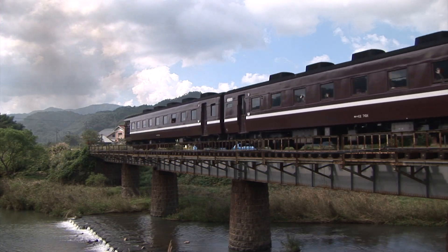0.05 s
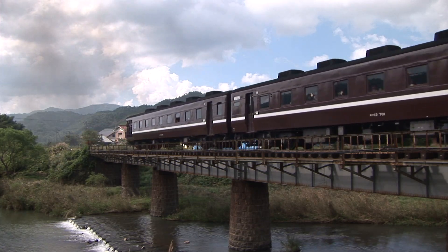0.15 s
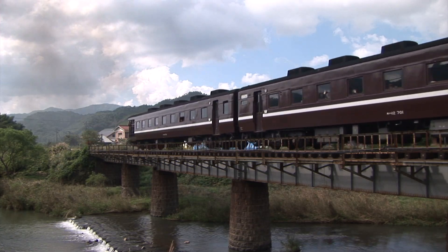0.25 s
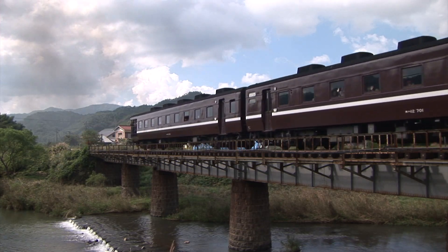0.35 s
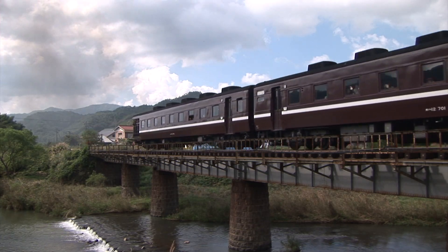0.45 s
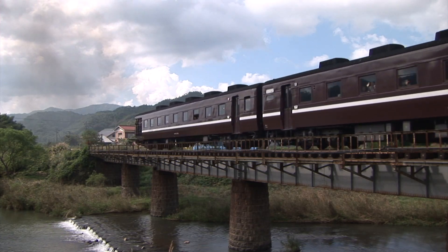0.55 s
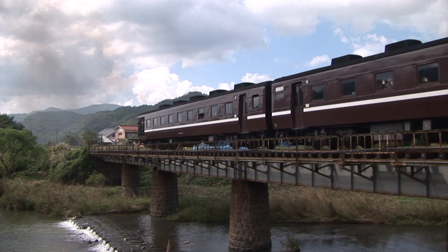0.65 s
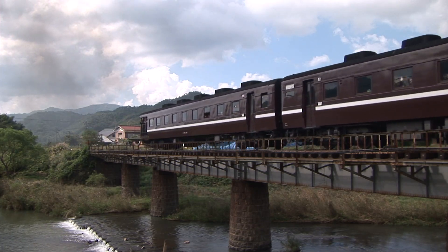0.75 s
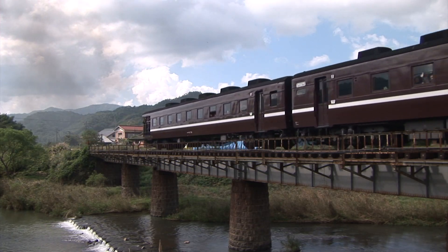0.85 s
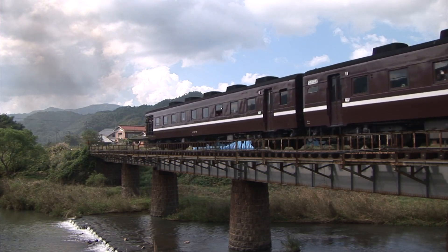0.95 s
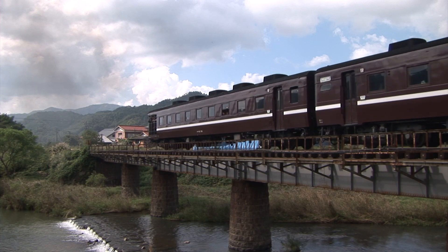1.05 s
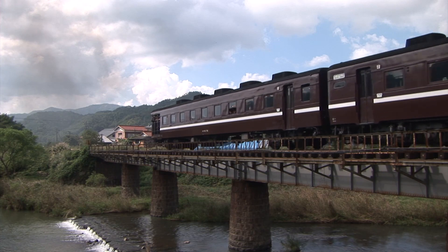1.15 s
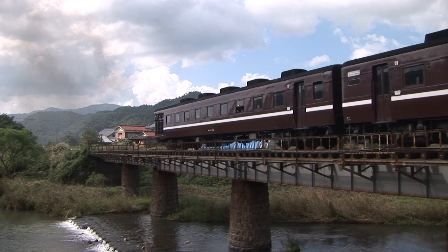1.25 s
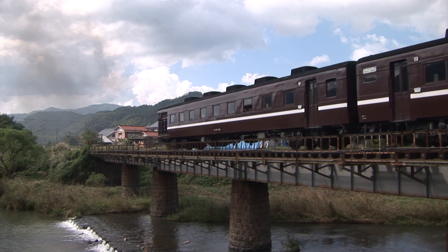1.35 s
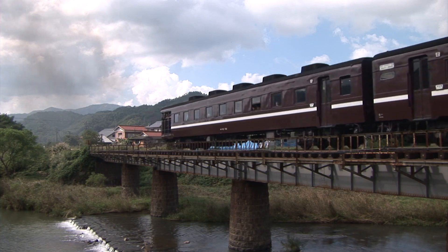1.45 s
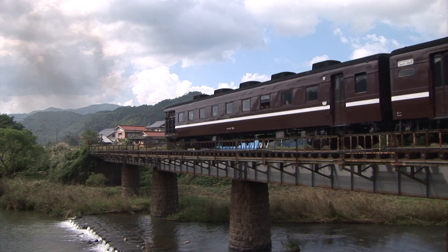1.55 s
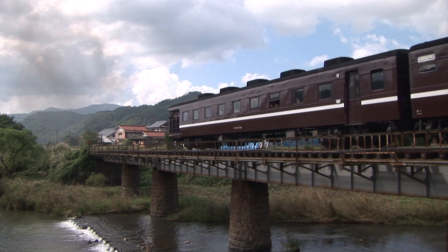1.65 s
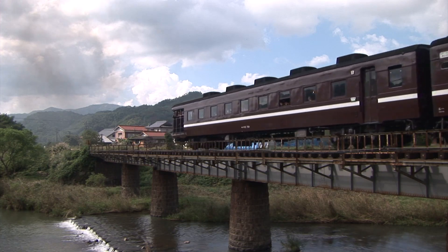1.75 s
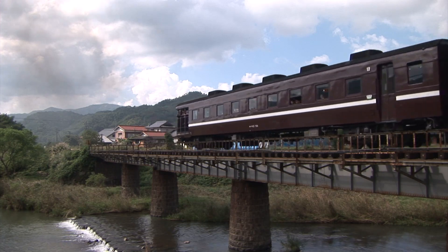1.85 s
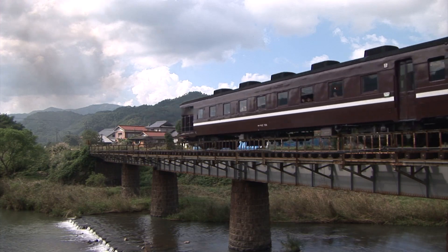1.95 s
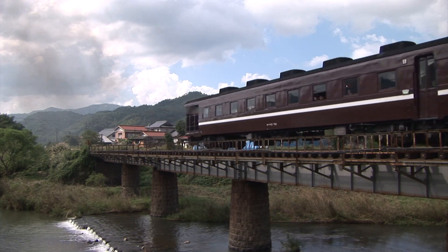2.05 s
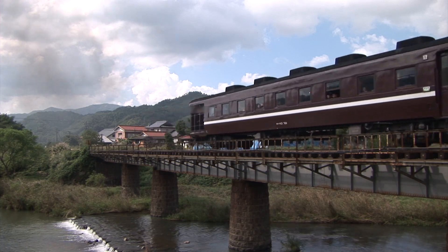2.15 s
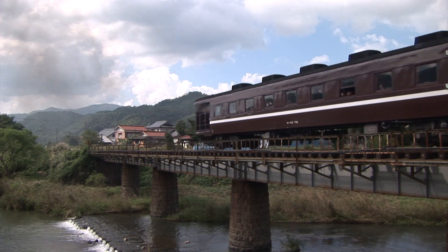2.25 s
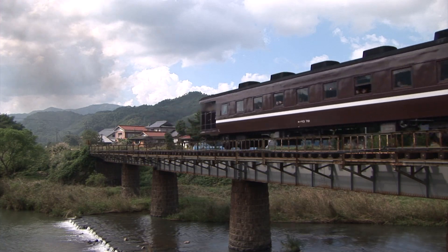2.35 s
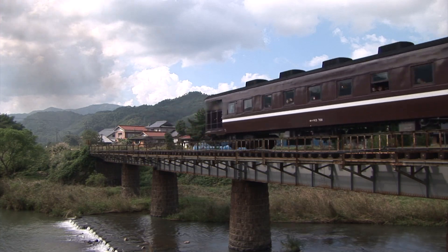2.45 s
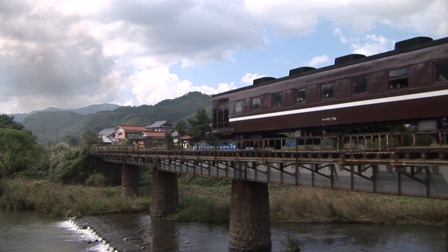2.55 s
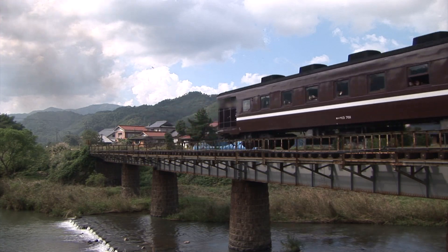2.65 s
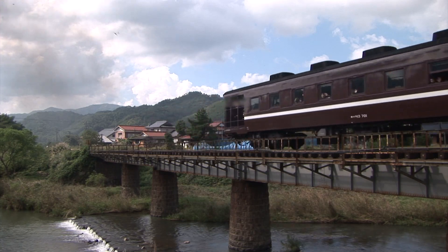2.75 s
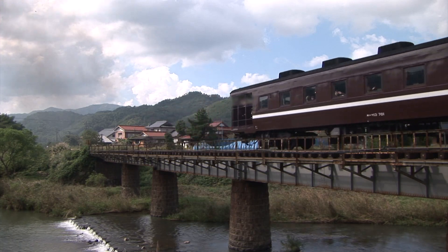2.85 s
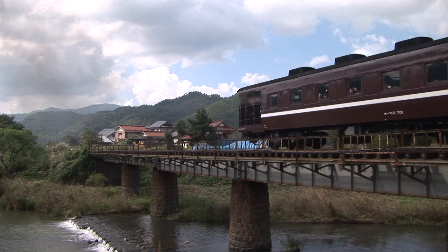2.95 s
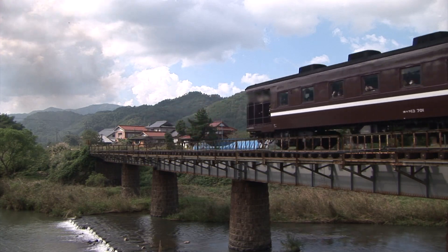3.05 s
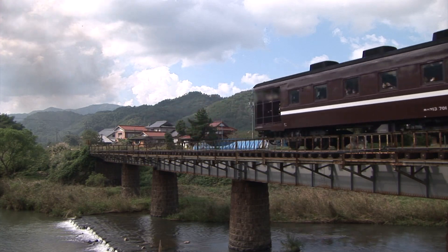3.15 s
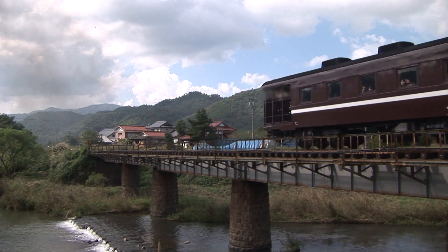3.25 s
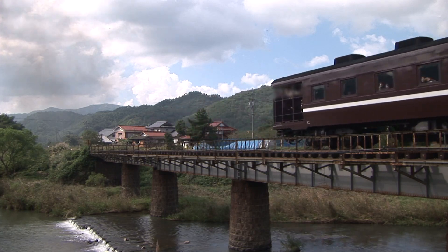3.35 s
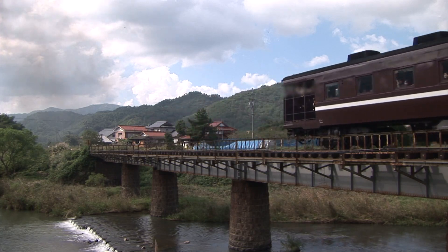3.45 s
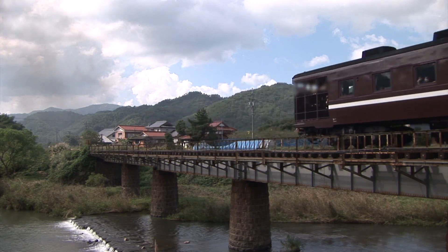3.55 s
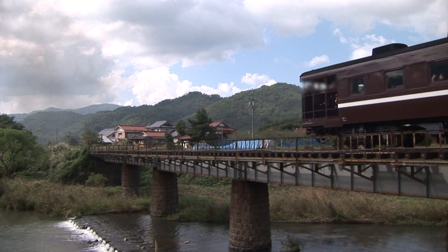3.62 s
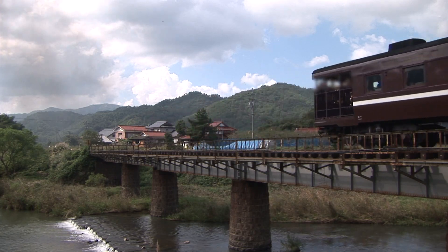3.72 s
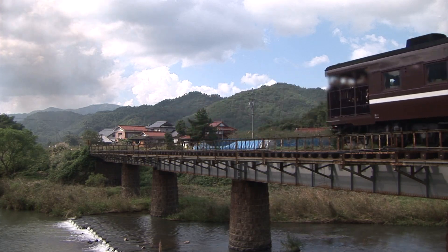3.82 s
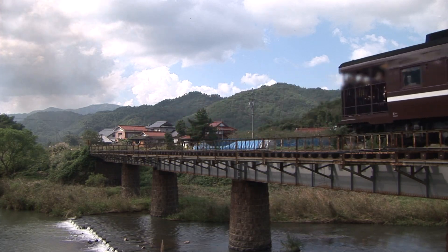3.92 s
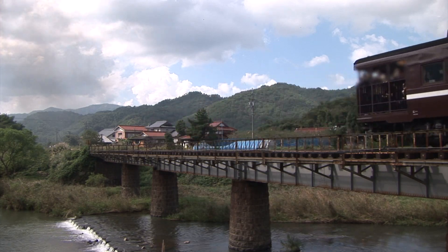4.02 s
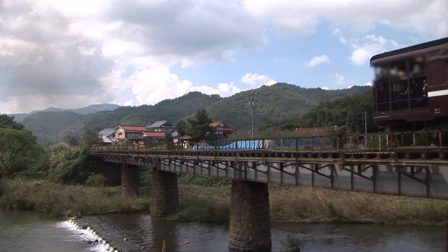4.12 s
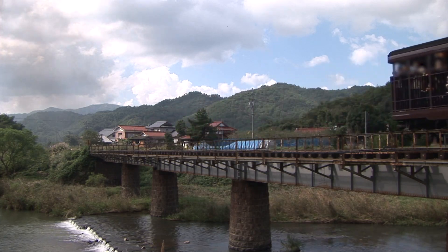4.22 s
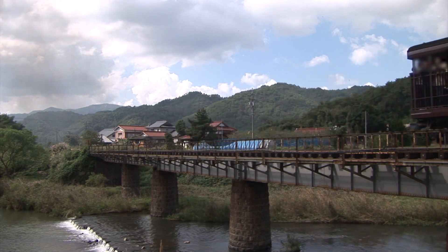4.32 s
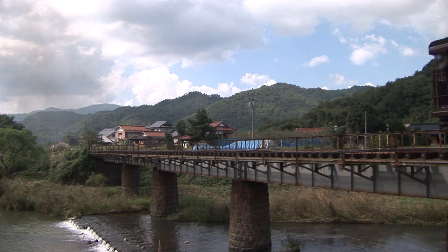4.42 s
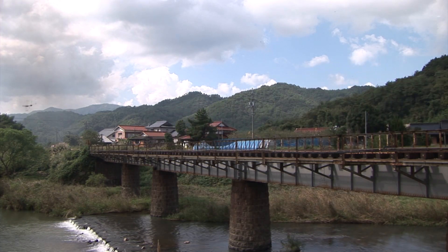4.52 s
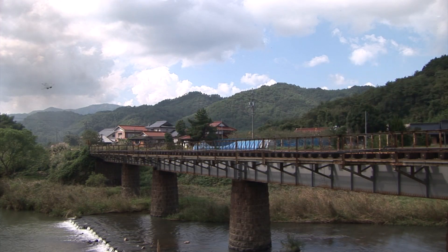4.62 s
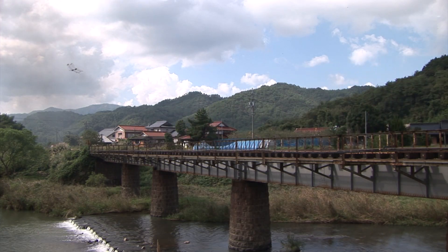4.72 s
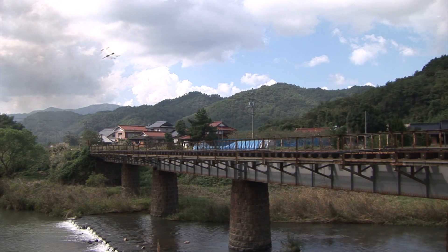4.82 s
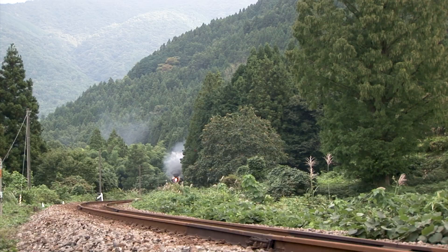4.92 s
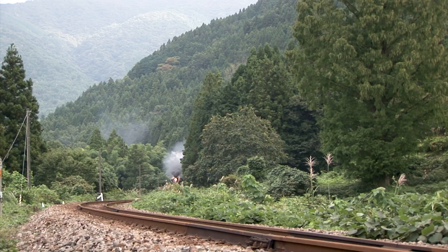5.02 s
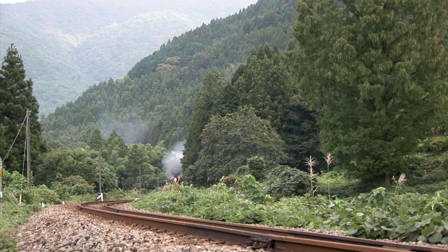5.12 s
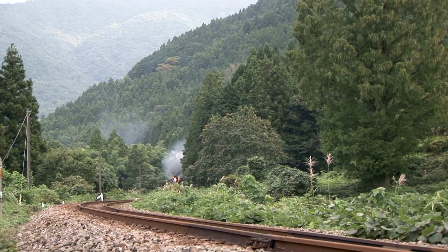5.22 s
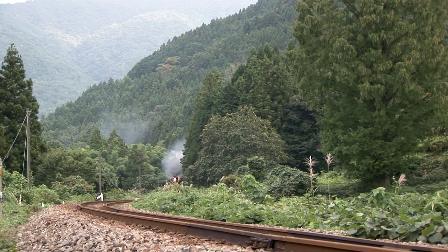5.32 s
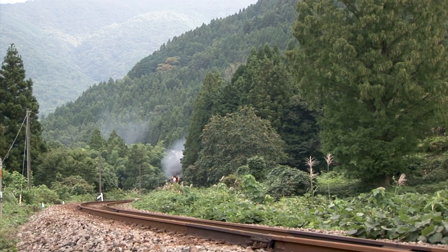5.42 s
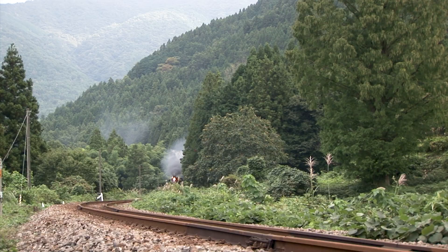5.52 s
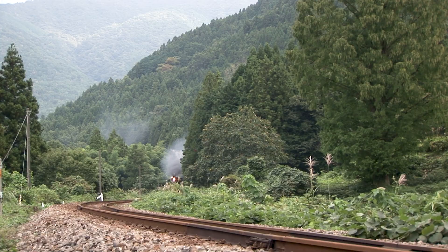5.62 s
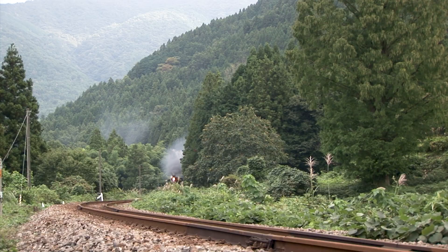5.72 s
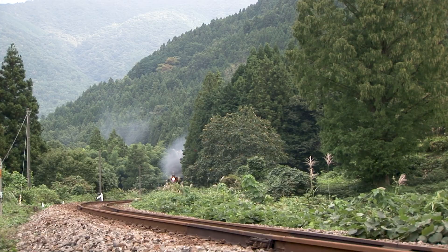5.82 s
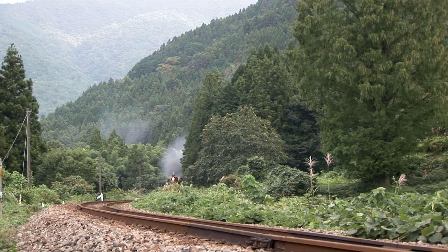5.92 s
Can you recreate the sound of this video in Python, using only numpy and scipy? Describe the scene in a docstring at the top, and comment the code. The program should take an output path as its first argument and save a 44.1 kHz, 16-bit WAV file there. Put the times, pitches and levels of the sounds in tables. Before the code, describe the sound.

Heard from a river bank, passenger coaches roar over a steel girder bridge. Wheels strike a rail joint on the right in pairs, each blow snapping, ringing and booming through the girders, with duller thumps farther ahead. A wheel squeals faintly as the last coach draws off to the right. The bridge fades out, and a very quiet wooded valley follows, with a far-off train murmur and thin bush crickets.

```python
"""From the river bank: the last passenger coaches of a train roar across a steel girder bridge.
Wheels thump on a far rail joint straight ahead, and four two-axle bogies strike a near one on the right:
steel snaps, wheels ring, girders boom, now and then a flange sings. The last coach draws off to the right
and the bridge fades out by 4.9 s. A quiet wooded valley fades in, with a very distant train and
bush crickets in the weeds."""
import sys
import numpy as np
from scipy import signal
from scipy.io import wavfile

SR = 44100
rng = np.random.default_rng(int(sys.argv[2]) if len(sys.argv) > 2 else 0)


def generate_wav(signal):
    """Clip the signal to [-1, 1] and save it as 16-bit WAV at the path in sys.argv[1]."""
    frames = np.transpose(np.atleast_2d(signal))
    scaled = np.clip(frames, -1, 1) * 32767
    pcm = np.round(scaled).astype(np.int16)
    wavfile.write(sys.argv[1], SR, pcm)


N = 263277
TIME = np.arange(N) / SR
EDGES = np.geomspace(28, 15500, 23)  # noise bands [Hz]
CENTRES = np.sqrt(EDGES[1:] * EDGES[:-1])

# bogies at the near joint: (time [s], gap to the second axle [s], force [dB], long ring [dB])
BOGIES = [(0.1802, 0.26, -17, -1.5), (2.012, 0.25, -17.5, -0.3), (2.8984, 0.2502, -18, -2),
          (4.680, .252, -18.5, -1.5)]
# wheels at the far joint: (time [s], force [dB], brightness [dB/octave], long ring [dB])
FAR_STRIKES = [(-.038, -20, -0.23, 2.5), (1.55, -18, 0, -1.5), (1.81, -20, -0.5, 2)]
# a source on the right, at the microphone: (frequency [Hz], left minus right [dB])
RIGHT_PAN = [(80, -0.5), (220, 2.5), (600, -5), (1200, -6), (2600, -7), (4500, -2.5), (8000, 0.5),
             (13000, -2.5)]


def from_db(db):
    """Decibels to gain."""
    return 10 ** (np.asarray(db) / 20)


def unit_rms(x):
    """Scale to an rms of 1."""
    return x / np.sqrt(np.mean(x ** 2) + 1e-20)


def at_hz(points, hz):
    """Read a table on a log-frequency axis."""
    f, value = np.transpose(points)
    return np.interp(np.log(hz), np.log(f), value)


def band_gains(colour):
    """The rms of each band for a sound of this colour and unit power."""
    gains = from_db(at_hz(colour, CENTRES)) * np.sqrt(np.diff(EDGES))
    return gains / np.linalg.norm(gains)


def pan(left_db):
    """Left and right gains for a level difference."""
    gains = from_db(np.array([[.5], [-.5]]) * left_db)
    return gains / np.sqrt(np.mean(gains ** 2, axis=0))


def drift(rate):
    """A random wander of unit rms, with `rate` turns a second."""
    knots = rng.standard_normal(4096)
    return unit_rms(np.interp(TIME * rate, np.arange(len(knots)), knots))


def stereo_noise(alike):
    """White noise with a given left-right correlation."""
    mid, side = rng.standard_normal((2, N))
    alike = np.clip(alike, 0, .998)
    return np.sqrt((1 + alike) / 2) * mid + np.sqrt((1 - alike) / 2) * side * [[1], [-1]]


def dense_modes(spread):
    """Countless overlapping modes: unit stereo noise in each band, its image wider with spread."""
    # likeness of the channels at spread 1: (frequency [Hz], correlation [0-1])
    likeness = [(60, .99), (250, .95), (600, .92), (1200, .91), (2500, .87), (4500, .72), (8000, .95),
                (13000, .85)]
    correlations = 1 - spread * (1 - at_hz(likeness, CENTRES))
    filters = [signal.butter(2, edge, "band", fs=SR, output="sos") for edge in zip(EDGES, EDGES[1:])]
    return [unit_rms(signal.sosfilt(f, stereo_noise(alike))) for f, alike in zip(filters, correlations)]


def resonate(force, modes):
    """Parallel resonances (frequency [Hz], width [Hz], level [dB] under unit white noise)."""
    out = 0
    for hz, width, db in modes:
        r = np.exp(-np.pi * width / SR)
        gain = from_db(db) * np.sqrt((1 - r * r) / 2)
        feedback = [1, -2 * r * np.cos(2 * np.pi * hz / SR), r * r]
        out = out + gain * signal.lfilter([1, 0, -1], feedback, force + 1e-18)
    return out


def swell(starts, rise_s, t60):
    """One row per blow: power that builds up and dies away."""
    age = np.maximum(TIME - np.asarray(starts)[:, None], 0)
    return (1 - np.exp(-age / rise_s)) ** 2 * np.exp(-np.minimum(np.log(1e6) * age / t60, 60))


def blow_power(strikes, colour, swells, extra_db):
    """Power in time for each band, summed over blows of their own force and brightness."""
    _, force_db, tilt_db, _ = np.transpose(strikes)
    octaves = np.log2(CENTRES / 500)[:, None]
    gains = band_gains(colour)[:, None] * from_db(force_db + extra_db + octaves * tilt_db)
    return gains ** 2 @ swells


def near_strikes():
    """Rows like FAR_STRIKES; each second wheel meets a rail still shaking: brighter, with more ring."""
    first = [(s, db, 0, ring_db) for s, gap, db, ring_db in BOGIES]
    second = [(s + gap, db - .04, .29, ring_db + 3.5) for s, gap, db, ring_db in BOGIES]
    return first + second


def fader(position):
    """Square-law gain for a fader position 0-1."""
    return np.clip(position, 0, 1) ** 2


def valley(level_db=-61.5):
    """Far off among the woods a train murmurs under a thin high hiss."""
    # the murmur: (frequency [Hz], relative density [dB])
    colour = [(30, 1.5), (60, 0), (110, -6), (180, 3.5), (330, 0), (520, 2.5), (730, -8), (1250, -5.5),
              (2000, -18), (3200, -22), (5500, -24.5), (9500, -25), (12500, -26), (14500, -33.5)]
    # faint peaks in the hiss: (frequency [Hz], width [Hz], relative level [dB])
    hiss_peaks = [(4150, 370, -1), (6370, 145.5, -2)]
    bands = zip(dense_modes(spread=2.2), band_gains(colour))
    murmur = sum(band * gain * from_db(.5 * drift(rate=9)) for band, gain in bands)
    hiss = from_db(-81) * resonate(stereo_noise(alike=.47), hiss_peaks)
    return pan(left_db=1.5) * (from_db(level_db) * murmur + hiss)


def bush_crickets(level_db=-77.5, strokes_per_s=37, wing_hz=11700, phrase_s=.4, peak_at_s=5.6):
    """Each wing stroke is a short, very high rasp of uneven strength; the song swells in even phrases."""
    pace = strokes_per_s * (1 + .22 * drift(rate=25))
    strokes = np.abs(np.sin(np.pi * np.cumsum(pace) / SR)) * from_db(1.3 * drift(rate=22))
    wing = [(wing_hz, 2600, 0)]
    rasp = unit_rms(resonate(resonate(stereo_noise(alike=.53), wing), wing))
    phrase_db = 3 * np.cos(2 * np.pi * (TIME - peak_at_s) / phrase_s)
    return from_db(level_db + phrase_db) * strokes * rasp


def rolling(level_db=-32, recede_from_s=3.36, recede_db_per_s=3, closest_after_s=.24, close_for_s=.25):
    """Rough treads shake the span and keep plates and wheels singing; a close bogie adds bass and top."""
    # the roar of the span: (frequency [Hz], relative density [dB])
    colour = [(18, -57), (30, -30.5), (170, -2), (334, -2.5), (422, 1), (469, -0.5), (533, -4),
              (1160, -7.5), (1850, -17.5), (2160, -18), (2340, -19.5), (3540, -27.5), (4590, -43),
              (8780, -66), (14700, -67.5)]
    # singing plates and wheels: (frequency [Hz], width [Hz], relative level [dB])
    modes = [(296.3, 10, 2.5), (432, 17, -3.5), (536, 7, 12), (2126, 32, 2), (2442, 35, -5),
             (2750, 22, -5.5), (3230, 24, -11.5), (3404, 27, -17), (3970, 33, -11), (4230, 30, -15.5)]
    close = sum(np.exp(-.5 * ((TIME - s - closest_after_s) / close_for_s) ** 2) for s, *_ in BOGIES)
    receding_s = np.maximum(TIME - recede_from_s, 0)
    tilt_db = .04 + 2 * close * np.exp(-receding_s)  # per octave; dulls as the last coach draws away
    bass_db = -.5 + 5 * close
    bearing = .15 + .1 * TIME  # 0 ahead, 1 right
    roar = 0
    for band, gain, hz in zip(dense_modes(spread=1.4), band_gains(colour), CENTRES):
        colour_db = tilt_db * np.log2(max(hz / 500, 1)) + bass_db / (1 + (hz / 250) ** 2)
        flicker_db = .5 * drift(rate=21)
        roar = roar + band * gain * from_db(colour_db + flicker_db) * pan(bearing * at_hz(RIGHT_PAN, hz))
    tones = from_db(-22.5) * pan(-5 * bearing) * resonate(stereo_noise(alike=.87), modes)
    drop_db = close + recede_db_per_s * receding_s
    return from_db(level_db - drop_db) * (roar + tones)


def flanges():
    """Jolted flanges brush the rail in fits; now and then stick and slip makes one wheel mode sing."""
    # shimmer of flange on rail: (frequency [Hz], width [Hz], relative level [dB])
    shimmer = [(8700, 90, -63), (8910, 90, -62)]
    # brief squeals: (start [s], end [s], frequency [Hz], level [dB])
    squeals = [(1.49, 1.563, 6570, -64), (4.05, 4.75, 3460, -58.5), (4.573, 4.693, 3440, -51)]
    blows = [s for s, *_ in near_strikes() + FAR_STRIKES]
    jolts = np.sqrt(swell(blows, rise_s=.13, t60=1.7).sum(axis=0))
    fits = from_db(4.5 * drift(rate=13))
    out = resonate(jolts * fits * rng.standard_normal(N), shimmer)
    for start, end, hz, db in squeals:
        grip = np.sin(np.pi * np.clip((TIME - start) / (end - start), 0, 1))
        out += resonate(grip * rng.standard_normal(N), [(hz, hz / 130, db)])
    return out


def long_ring(strikes, rise_s, t60):
    """Band power that lingers in the rails and the whole span after each blow."""
    # the ringing span: (frequency [Hz], relative density [dB])
    colour = [(30, -36.5), (55, -5.5), (85, -9), (140, 5), (280, 4.5), (550, 4), (1100, -5), (2700, -9),
              (5000, -22), (7000, -31), (11000, -42.5), (14500, -44.5)]
    starts, _, _, ring_db = np.transpose(strikes)
    return blow_power(strikes, colour, swell(starts, rise_s, t60), ring_db - 7)


def far_joint(air_delay_s=.022):
    """Straight ahead and dull: a tick and a shudder come through the steel, then a boom through the air."""
    # the tick along the rail: (frequency [Hz], relative density [dB])
    tick_colour = [(100, -7), (400, 3.5), (1200, -3), (3000, -13), (6000, -25), (9000, -26.5), (11300, -20),
                   (14500, -36)]
    # the far girders: (frequency [Hz], relative density [dB])
    girder_colour = [(30, -57.5), (60, -22.5), (110, -17), (190, 10), (350, 0.5), (550, 9.5), (900, -2),
                     (1500, -1.5), (3000, -25.5), (5500, -34), (10000, -55), (14500, -64)]
    starts = np.array(FAR_STRIKES)[:, 0]
    tick_bands = (from_db(-33.5) * band_gains(tick_colour)) ** 2
    tick = np.outer(tick_bands, swell(starts, rise_s=.00062, t60=.089).sum(axis=0))
    shudder_bands = (from_db(-21) * band_gains(girder_colour)) ** 2
    shudder = np.outer(shudder_bands, swell(starts, rise_s=.013, t60=.3).sum(axis=0))
    boom_swells = swell(starts + air_delay_s, rise_s=.023, t60=.36)
    boom = blow_power(FAR_STRIKES, girder_colour, boom_swells, extra_db=7)
    power = tick + shudder + boom + long_ring(FAR_STRIKES, rise_s=.046, t60=1.87)
    return pan(left_db=-.3) * sum(band * np.sqrt(p) for band, p in zip(dense_modes(spread=.2), power))


def knocks(hz=300, t60=.024):
    """Slack in the running gear is taken up with a short, heavily damped thud."""
    # thuds just past the near joint: (time [s], level [dB])
    thuds = [(0.261, -14), (2.106, -15), (3.028, -13), (3.338, -16.5)]
    out = np.zeros(N)
    for s, db in thuds:
        age = np.clip(TIME - s, 0, 1)
        out += from_db(db - 60 * age / t60) * np.sin(2 * np.pi * hz * age)
    return out


def struck(modes, gain_db, rise_s, waver):
    """Each near blow rings each mode with a strength of its own; under a moving load the pitch wavers."""
    out, age = np.zeros((2, N)), TIME[:SR]
    for hz, t60, db in modes:
        phase = 2 * np.pi * hz * np.cumsum(1 + waver * drift(rate=70)) / SR
        envelope = (1 - np.exp(-age / rise_s)) * 1000 ** (-age / t60)
        mode = np.zeros(N)
        for s, force_db, _, ring_db in near_strikes():
            at = int(s * SR)
            height = from_db(force_db + ring_db + db + gain_db + rng.normal(0, 2.06))
            mode[at:at + SR] += height * envelope * np.sin(phase[at:at + SR])
        out += pan(at_hz(RIGHT_PAN, hz)) * mode
    return out


def ringing_steel():
    """The wheel clangs at once; the heavy plates below take a moment to swing up."""
    # the struck wheel: (frequency [Hz], t60 [s], relative level [dB])
    wheel_modes = [(2110, .25, -9), (2497, .3, -2), (2745, .36, -3), (3195, .36, -10), (3450, .5, -10.5),
                   (3780, .12, -12), (3965, .25, -18), (5672, .5, -26), (6085, .4, -28), (6635, .25, -21),
                   (8722, .4, -30)]
    # the girder plates: (frequency [Hz], t60 [s], relative level [dB])
    plate_modes = [(56.7, 1, -19), (119.4, 0.5, -10.5), (160.2, 0.56, -6.5), (190, .55, -5.5),
                   (237, 0.61, -4), (258.2, 0.86, -4), (294.4, 1.0, -2), (365, 0.56, -1.5), (425, 0.75, -4),
                   (486, .45, -4.5)]
    wheels = struck(wheel_modes, gain_db=-10, rise_s=.0006, waver=.00553)
    plates = struck(plate_modes, gain_db=-5, rise_s=.038, waver=.015)
    return wheels + plates


def near_joint():
    """Near right: the rail end dips, steel snaps on steel and rattles, the girder booms and rings on."""
    # wheel on rail end: (frequency [Hz], relative density [dB])
    crack_colour = [(100, -20), (300, 7), (550, 10), (1000, 0), (1800, -5), (3400, -10.5), (5000, -25.5),
                    (8000, -29.5), (11000, -39), (14500, -44.5)]
    # the girder below: (frequency [Hz], relative density [dB])
    boom_colour = [(30, -49), (55, -16), (85, -20.5), (130, 0.5), (250, 4.5), (520, 8.5), (900, 0),
                   (1800, -16.5), (3300, -24.5), (5000, -56), (10000, -43.5), (14500, -68)]
    # loose fittings: (frequency [Hz], relative density [dB])
    sizzle_colour = [(2500, -29.5), (5000, -2.5), (6800, 2.5), (9000, 1.5), (11300, -1.5), (14500, -10)]
    strikes = near_strikes()
    starts = np.array(strikes)[:, 0]
    dip = blow_power(strikes, boom_colour, swell(starts - .022, rise_s=.006, t60=.15), extra_db=-5.5)
    snap = blow_power(strikes, crack_colour, swell(starts, rise_s=.0005, t60=.08), extra_db=1)
    rattle = blow_power(strikes, crack_colour, swell(starts, rise_s=.002, t60=.35), extra_db=-1.5)
    sizzle = blow_power(strikes, sizzle_colour, swell(starts, rise_s=.015, t60=.6), extra_db=-32.5)
    boom = blow_power(strikes, boom_colour, swell(starts, rise_s=.023, t60=.38), extra_db=5)
    tail = long_ring(strikes, rise_s=.03, t60=1.4)
    lows = 1 / (1 + (CENTRES[:, None] / 550) ** 2)  # the soft dip keeps the lows, the snap the highs
    power = dip * lows + snap * (1 - lows) + rattle + sizzle + boom + tail
    bands = zip(dense_modes(spread=.96), power, CENTRES)
    return sum(band * np.sqrt(p) * pan(at_hz(RIGHT_PAN, hz)) for band, p, hz in bands)


def scene():
    """The bridge, its top treble lost on the way across the river, fades out; the valley fades in."""
    bridge = near_joint() + far_joint() + ringing_steel() + knocks() + rolling() + flanges()
    at_bank = signal.sosfilt(signal.butter(5, 11900, fs=SR, output="sos"), bridge)
    fade_out = fader((4.901 - TIME) / .34)
    fade_in = fader((TIME - 4.95) / .28)
    return at_bank * fade_out + (valley() + bush_crickets()) * fade_in


def record(dry):
    """The microphone sheds the bass below 46 Hz; the top is cut at 14.25 kHz."""
    thinned = signal.sosfilt(signal.butter(6, 46, "high", fs=SR, output="sos"), dry)
    return signal.sosfilt(signal.ellip(10, .1, 80, 14250, fs=SR, output="sos"), thinned)


dry = scene()
out = record(dry)
generate_wav(out)
```